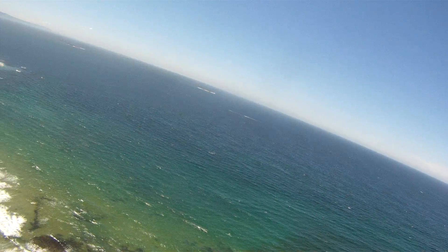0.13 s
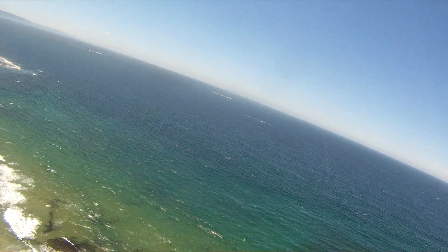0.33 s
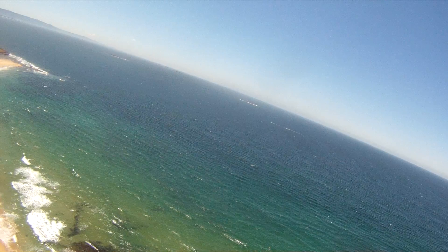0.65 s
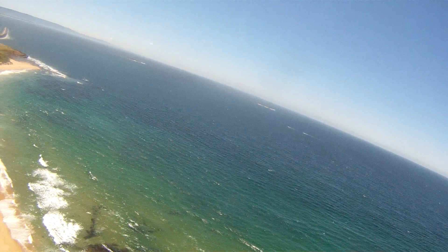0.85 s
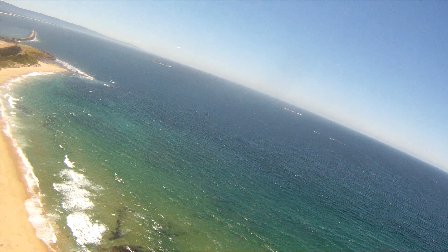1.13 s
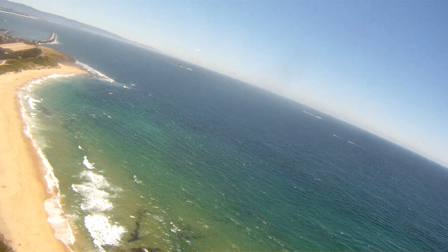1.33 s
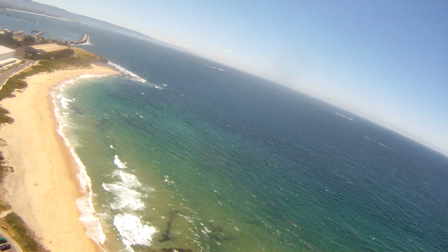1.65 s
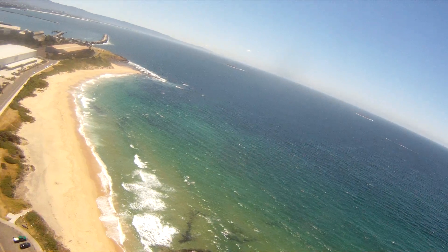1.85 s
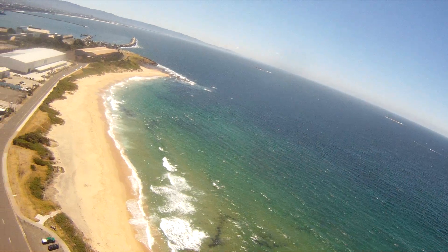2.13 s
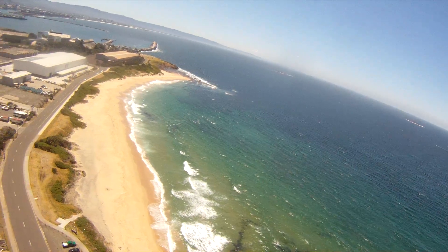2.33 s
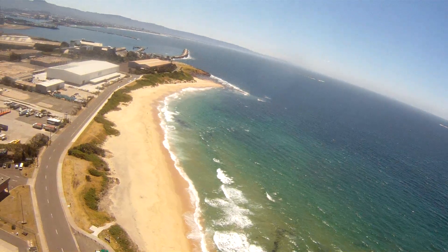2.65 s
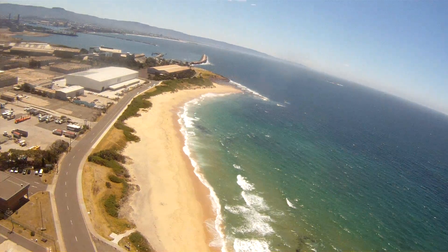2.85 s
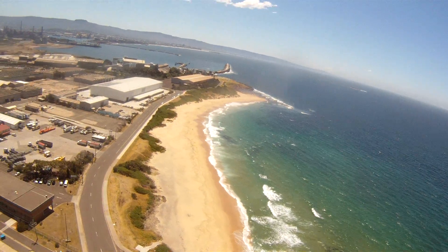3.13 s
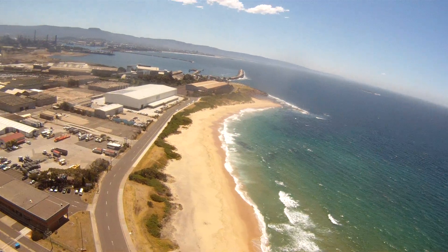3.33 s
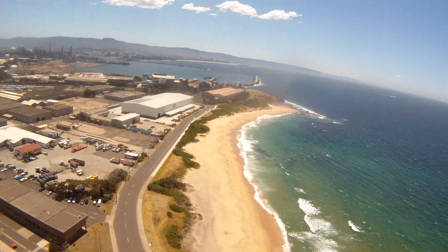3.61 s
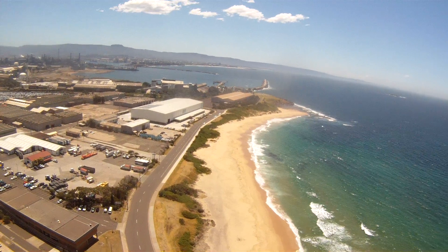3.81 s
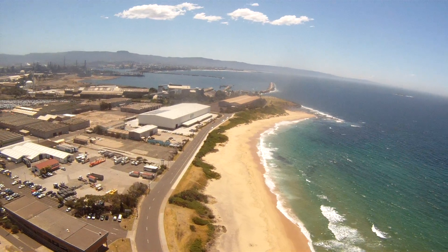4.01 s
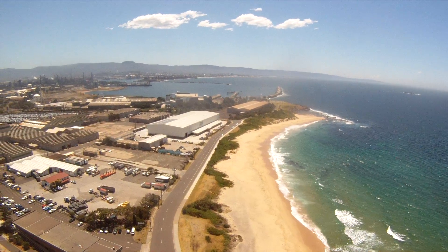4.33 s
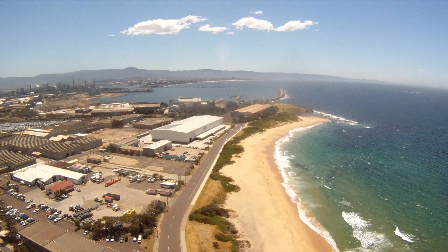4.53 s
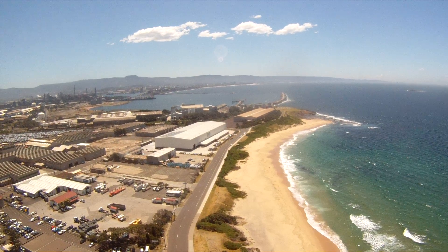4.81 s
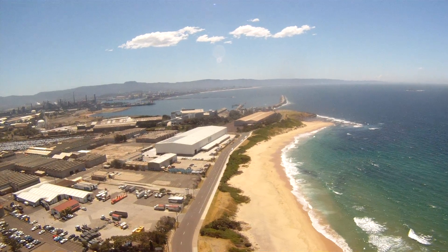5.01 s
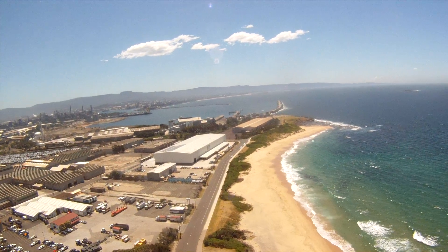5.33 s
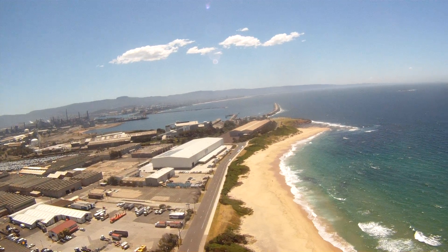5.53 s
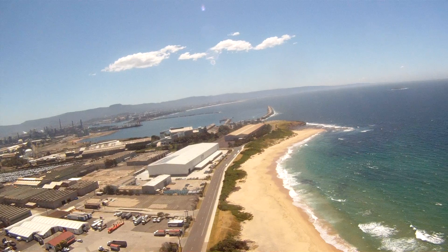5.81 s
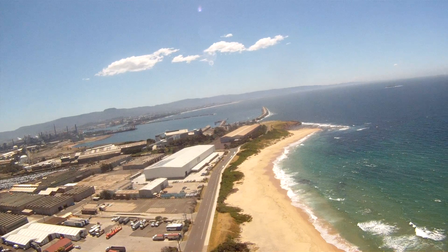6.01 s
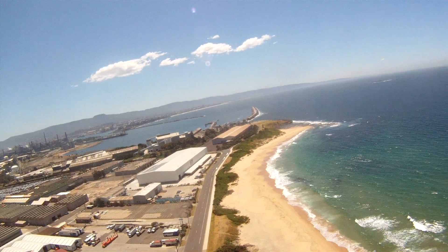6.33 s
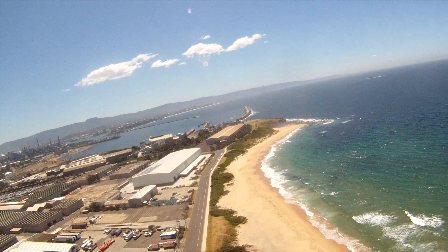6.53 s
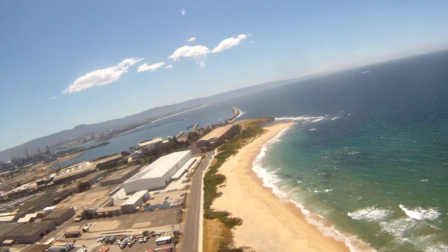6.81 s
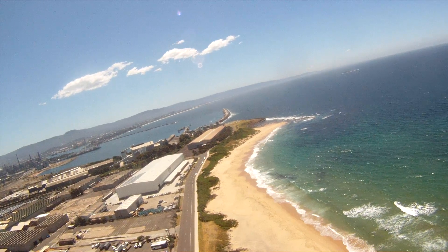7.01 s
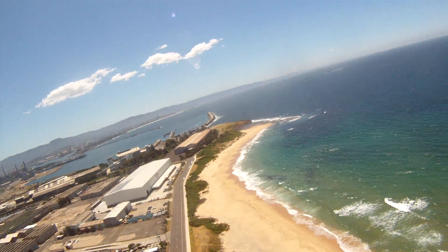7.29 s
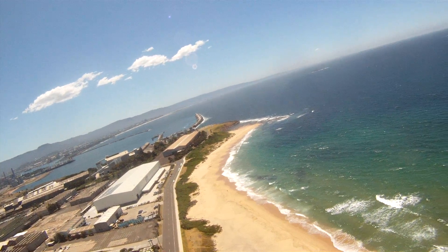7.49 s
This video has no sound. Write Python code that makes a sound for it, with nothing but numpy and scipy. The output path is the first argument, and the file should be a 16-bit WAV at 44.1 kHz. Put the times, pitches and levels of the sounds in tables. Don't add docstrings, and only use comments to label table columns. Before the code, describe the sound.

Wind presses on a camera microphone high in open air: deep uneven flutter, a hollow hum from the frame tube and a narrow nasal hiss. Early dull blows and air thumps give way to calmer flow with a thin steady whistle and a very faint lower drone. Loose fittings tick; taut wires snap with a short falling zip and low twang. Late on, a small hiss swell, more snaps and softer rumble.

```python
import sys
import numpy as np
from scipy import signal
from scipy.fft import rfft, irfft, next_fast_len
from scipy.io import wavfile
from scipy.ndimage import uniform_filter1d, map_coordinates

SR = 44100
rng = np.random.default_rng(int(sys.argv[2]) if len(sys.argv) > 2 else 0)


def invert_db(x):
    u = np.asarray(x, float) / 20
    return 10 ** u


def bounce(signal):
    frames = np.transpose(np.atleast_2d(signal))
    limited = np.clip(frames, -1, 1)
    pcm = np.round(limited * 32767).astype(np.int16)
    wavfile.write(sys.argv[1], SR, pcm)


N = 337806

# (time [s], strength [dB], lean to slow eddies [dB])
TURBULENCE = [(0, -29, 0.5), (.6, -33.5, 0), (1.05, -29, -0.5), (1.3, -28.5, 6), (1.55, -32.5, 2.5),
              (2.1, -31.5, 2), (2.6, -32, -2), (3.3, -30.5, -0.5), (4.0, -31, -2), (4.9, -32, -1),
              (5.5, -33.5, -2), (6.3, -35, 0), (6.9, -35.5, -3), (7.66, -37, 3.5)]


def unit(x):
    return x / np.sqrt(np.mean(x ** 2) + 1e-20)


def curves(rows):
    s, *cols = np.transpose(rows)
    return [np.interp(np.arange(N) / SR, s, c) for c in cols]


def wobble(knots_per_s):
    knots = rng.standard_normal(int(N * knots_per_s / SR) + 4)
    return map_coordinates(knots, [np.arange(N) * knots_per_s / SR])


def filtered(x, response):
    m = next_fast_len(len(x) + SR // 2)
    return irfft(rfft(x, m) * response(np.fft.rfftfreq(m, 1 / SR)), m)[:len(x)]


def modes(peaks):
    def response(f):
        return sum((-1) ** k * invert_db(db) * 1j * f * width / (hz * hz - f * f + 1j * f * width)
                   for k, (hz, width, db) in enumerate(peaks))
    return response


def jolted(response):
    return filtered(np.pad([1.], (0, SR // 2)), response)


def rush(peaks, steep, patchy_db=0):
    z = signal.stft(rng.standard_normal(N + 512), nperseg=512)[2]
    field = uniform_filter1d(rng.standard_normal(z.shape), size=6, axis=0)
    field = uniform_filter1d(field, size=10, axis=1)
    noise = signal.istft(z * invert_db(patchy_db * unit(field)), nperseg=512)[1][:N]
    return unit(filtered(noise, lambda f: np.abs(modes(peaks)(f)) ** steep))


def tone(rows, db, fade_s, edge_db, jitter_hz, flutter_db):
    hz, = curves(rows)
    t = np.arange(N) / SR
    inside_s = np.minimum(t - rows[0][0], rows[-1][0] - t)
    level_db = db + 3 + edge_db * np.clip(1 - inside_s / fade_s, 0, 1) + flutter_db * wobble(25)
    phase = 2 * np.pi * np.cumsum(hz + jitter_hz * wobble(60)) / SR
    return np.clip(inside_s / 0.026, 0, 1) * invert_db(level_db) * np.sin(phase)


def drone():
    # (time [s], pitch [Hz])
    pitch = [(2.2, 610), (3.3, 671), (5.1, 664), (5.8, 616), (6.6, 612)]
    return tone(pitch, db=-62.5, fade_s=0.88, edge_db=-4, jitter_hz=19.36, flutter_db=3)


def whistle():
    # (time [s], pitch [Hz])
    pitch = [(3.05, 2405), (3.36, 2448), (3.68, 2461), (3.8, 2478), (4.17, 2464), (4.3, 2485), (4.6, 2484),
             (4.9, 2454), (5.72, 2410)]
    return tone(pitch, db=-45.2, fade_s=.22, edge_db=-6, jitter_hz=3.7, flutter_db=1.5)


def seam():
    best_s, turn_s, loud_db, rest_db = 1.1, 1.45, -33.5, -50.5
    facing = np.exp(-((np.arange(N) / SR - best_s) / turn_s) ** 2)
    level_db = rest_db + (loud_db - rest_db) * facing + 0.4 * wobble(30)
    return invert_db(level_db) * rush([(2138, 160, 0)], steep=1.36)


def airflow():
    # (time [s], level [dB])
    flow = [(0.0, -32), (0.47, -32), (0.81, -33), (1.47, -34), (1.75, -32), (2.13, -33.5), (2.42, -31),
            (2.6, -35.5), (2.74, -39.5), (2.97, -37.5), (3.13, -40), (3.37, -40.5), (4.9, -42.5),
            (5.95, -40.5), (6.2, -37), (6.63, -35.5), (6.9, -37.5), (7.66, -38)]
    # (time [s], level [dB], half length [s])
    gusts = [(5.675, 7.5, 0.071)]
    # (time [s], level [dB], half length [s])
    shakes = [(.75, -4.5, 0.49), (2.0, 11, 0.13), (2.9, 3.5, 0.29), (6.1, 0, .1)]
    # (level [dB], growth with flow [dB/dB])
    hiss = [
        (-46, 0.78),
        (-38.5, 1.05),
        (-45.5, 1.06),
        (-55.5, 1.16),
    ]
    # (centre [Hz], width [Hz], level [dB])
    tube = [(162, 64, -9), (221.3, 24.6, 2), (243.2, 37.4, -3.5)]
    hum = [(389, 44, -0.5), (615, 44, -0.5), (855, 570, -6.5), (1540, 207, 1)]
    low = [(964, 55, -7), (1158, 102, 5.5), (1309, 125, 1)]
    mid = [(1700, 170, -1.5), (1969, 131, 1.5), (2151, 255, -2), (2532, 99, -2.5)]
    high = [(2738, 190, 1.83), (3083, 286, 1.86), (3302, 345, -0.89)]
    top = [(3757, 276, 3), (4615, 314, 2), (5590, 1200, -4)]
    full_flow_db = -38
    tube_db, tube_grows, hum_db, hum_grows = -47, 0.2, -50.5, 0.25

    t = np.arange(N) / SR
    gust_db = .4 * wobble(18) + 1.1 * wobble(45)
    swell_db = sum(db * np.exp(-((t - s) / half_s) ** 4) for s, db, half_s in gusts)
    rough_db = sum(db * np.exp(-((t - s) / half_s) ** 2) for s, db, half_s in shakes)
    strength_db = curves(TURBULENCE)[0]
    shaking_db = strength_db - strength_db.mean()
    drumming_db = 1.5 * wobble(8)
    tube_level_db = tube_db + tube_grows * shaking_db + rough_db + drumming_db
    hum_level_db = hum_db + hum_grows * shaking_db + 0.29 * rough_db + gust_db
    out = invert_db(tube_level_db) * rush(tube, steep=1.02)
    out += invert_db(hum_level_db) * rush(hum, steep=1.44, patchy_db=2.0)
    flow_db = curves(flow)[0] - full_flow_db
    for (db, grows), peaks in zip(hiss, (low, mid, high, top)):
        out += invert_db(db + grows * flow_db + gust_db + swell_db) * rush(peaks, steep=1.29, patchy_db=0.08)
    return out


def ring(s, db, partials, t60_s, crack):
    t = np.arange(SR // 20) / SR
    rattle = 1 + .35 * unit(uniform_filter1d(rng.standard_normal(len(t)), size=40))
    tones = sum(invert_db(level_db) * np.sin(2 * np.pi * hz * t) for hz, level_db in partials)
    wave = rattle * tones + crack * rng.standard_normal(len(t))
    rise = 1 - np.exp(-t / .0008)
    return np.pad(invert_db(db - 60 * t / t60_s) * rise * wave, (round(s * SR), N))[:N]


def fittings():
    # (time [s], level [dB], low partial [Hz], high partial [Hz])
    ticks = [(0.9434, -23, 2240, 3200), (1.4134, -18.5, 2190, 3180), (1.776, -22, 2200, 3330),
             (2.4584, -26, 1950, 3360), (2.924, -19.5, 2240, 3570), (3.025, -27, 2120, 3230),
             (3.0744, -26, 2000, 3350), (4.3269, -19, 2374, 3520), (5.6783, -26, 1720, 3380),
             (5.874, -18, 1790, 3200), (6.2493, -23, 1700, 3600), (6.7531, -19, 1700, 3180)]
    # (time [s], level [dB], low partial [Hz], high partial [Hz])
    pricks = [(2.1214, -36, 3190, 4610), (2.6554, -37, 3140, 4540), (3.6252, -33.5, 3100, 4430),
              (3.8751, -29.5, 2980, 4730), (5.1183, -40, 3100, 5110), (5.384, -34.5, 3630, 4570),
              (6.2497, -29, 2900, 4840)]
    out = np.zeros(N)
    for s, db, low_hz, high_hz in ticks + pricks:
        partials = [(low_hz, 0), (low_hz * 1.18, -4), (high_hz, -9)]
        out += ring(s, db + 2.5, partials, t60_s=0.017, crack=0.032)
    return out


def knocks():
    # (time [s], level [dB], brightness [dB/octave])
    blows = [(0.16, -25, 4.5), (1.236, -47, 0), (1.311, -27.5, -3.5), (1.393, -24, 0), (1.51, -20.5, 3),
             (1.583, -24, 1), (1.712, -20.5, 3), (1.766, -19, 0), (1.95, -29.5, 5), (3.686, -40, 8),
             (4.328, -23, 0), (6.752, -21.5, 1.5)]
    # (centre [Hz], width [Hz], level [dB])
    knocked = [(100, 20, 3), (235.5, 19, 7), (395.5, 22.3, -0.5), (646, 49, -13), (970, 57, -15.5),
               (1186, 45, -8.5), (1850, 400, -20)]
    out = np.zeros(N)
    for s, db, tilt_db in blows:
        case = [(hz, width, level_db + tilt_db * np.log2(hz / 400) + rng.normal(0, 1))
                for hz, width, level_db in knocked]
        out[round(s * SR):][:SR // 2 + 1] += invert_db(db + 38) * jolted(modes(case))
    return out


def scrape(decay_s):
    t = np.arange(SR // 50) / SR
    rasp = np.exp(-t / decay_s) * rng.standard_normal(len(t))
    return rasp / np.linalg.norm(rasp)


def wire(events, bracket, snap, travel_s, skirt_db, knock_db):
    # (centre [Hz], width [Hz])
    drummed = (230, 47)

    def travel(f):
        return np.exp(-2j * np.pi * travel_s * 2200 * np.arctan(f / 2200))

    def swept(f):
        return (modes(bracket)(f) ** 2 + 0.28 * modes([(1250, 1700, 0)])(f) ** 3) * travel(f)

    def knocked(f):
        return modes(bracket[1:2])(f) ** 2 + 0.57 * modes(bracket[:1])(f) ** 2

    def tube(f):
        body = modes([(*drummed, 0)])(f) ** 3
        skirt = invert_db(skirt_db) * modes([(250, 210, 0)])(f) ** 3 * travel(f) ** 0.18
        return body + skirt + modes([(385, 60, -11)])(f) ** 2 + modes([(153, 40, -8)])(f) ** 2

    out = np.zeros(N)
    sweep, knock = jolted(swept), jolted(knocked)
    for s, wire_hz, tick_db, sweep_db, ring_db in events:
        def trips(f):
            return 1 / (1 - 0.8 / (1 + (f / 430) ** 4) * np.exp(-2j * np.pi * f / wire_hz))

        hum = jolted(lambda f: tube(f) * travel(f) ** 1.14 * trips(f))
        rasped = signal.fftconvolve(sweep, scrape(decay_s=.004))[:len(hum)]
        ragged = .6 * sweep + .7 * rasped
        twang = invert_db(sweep_db + 16) * ragged + invert_db(knock_db + 23.0) * knock + invert_db(ring_db + 27.5) * hum
        out[round(s * SR):][:len(hum)] += twang
        out += ring(s, tick_db - 2.5, snap, t60_s=0.013, crack=0.13)
    return out


def wires():
    # (time [s], wire [Hz], tick [dB], sweep [dB], ring [dB])
    plucks = [(4.470, 21.94, -20, 3.8, 7.7), (6.204, 21.37, -18.5, 1.8, 7.1)]
    # (time [s], wire [Hz], tick [dB], sweep [dB], ring [dB])
    twangs = [(2.797, 22.27, -48, -1.5, -6.5), (3.037, 22.48, -21, 0.5, -2.5),
              (3.957, 22.65, -28, 2.5, -0.5), (5.497, 22.38, -13, 3, -2), (6.647, 22.13, -11, 1, -2)]
    # (centre [Hz], width [Hz], level [dB])
    brackets = [
        [(665, 100, -6), (958, 70, -3), (1230, 150, 2), (1720, 160, -4.5), (2000, 140, -4)],
        [(724, 47, -1), (1316, 103, -2.5), (1560, 79, -2.5), (2120, 180, -4)],
    ]
    # (pitch [Hz], level [dB])
    snaps = [
        [(2550, 4), (3200, 9), (3600, -8), (5200, -6.5)],
        [(1950, -4), (2800, -2), (4650, -14), (5200, -14.5)],
    ]
    stiff = wire(plucks, brackets[0], snaps[0], travel_s=.021, skirt_db=-30, knock_db=2.1)
    loose = wire(twangs, brackets[1], snaps[1], travel_s=.018, skirt_db=-9, knock_db=-6.5)
    return stiff + loose


def evened(x):
    return unit(x / np.abs(signal.hilbert(x, next_fast_len(N))[:N]) ** 0.25)


def buffet():
    # (time [s], slow [dB], fast [dB])
    eddies = [(.43, 5, 7), (.87, 7.5, -4), (1.2, -2, -8), (1.71, 1, 5), (1.9, 10, 8), (2.03, -2, 5),
              (2.33, -3, 2.5), (2.45, -1, 6.5), (2.86, 0, -3), (2.98, -3, -14), (3.11, 5, -1), (3.77, 3, 4),
              (4.14, -2, 2.5), (4.2, 3, -14), (5.06, 2, -3), (5.7, -1, -2), (6.02, -11, 8), (6.19, 4, -14),
              (6.25, -9, 8), (6.47, 7, -10), (6.66, 0, 3), (7.38, 4, 3), (7.6, 6, -13)]
    # (time [s], pitch [Hz])
    eddy_size = [(0, 70.6), (1.2, 72), (1.6, 76), (2.5, 84.2), (4.2, 89), (5, 76.9), (6.8, 79.5),
                 (7.66, 76)]
    # (time [s], level [dB], pitch [Hz], half length [s])
    thumps = [(1.80, -30, 225, .025), (1.845, -31, 150, .02), (1.875, -32, 250, .02),
              (1.902, -20, 70, .015), (1.962, -29, 240, .015), (2.025, -16, 95, .013),
              (2.03, -30, 230, .02), (2.165, -25, 80, .02), (3.155, -29, 225, .03)]
    # (centre [Hz], width [Hz], level [dB])
    slow_peaks = [(25.8, 18.4, -4.5), (40.2, 10, 5)]
    # (centre [Hz], width [Hz], level [dB])
    fast_peaks = [
        [(72, 6.8, 9), (92.6, 11.4, -23)],
        [(83.7, 31, 6), (101, 31, -5.5)],
    ]
    slow_offset_db, fast_offset_db, wander_db, wander_per_s = -3, -4, 1.5, 9
    eddy_s = 0.025

    t = np.arange(N) / SR
    passing_db = sum(np.outer(db, np.exp(-((t - s) / eddy_s) ** 2)) for s, *db in eddies)
    strength_db, lean_db = curves(TURBULENCE)
    swing_db = wander_db * np.array([wobble(wander_per_s), wobble(wander_per_s)])
    slow_db, fast_db = strength_db + np.array([lean_db, -lean_db]) + passing_db + swing_db
    small = np.clip((curves(eddy_size)[0] - 72) / 14, 0, 1)
    fast = np.sqrt(1 - small) * rush(fast_peaks[0], steep=1.104)
    fast += np.sqrt(small) * rush(fast_peaks[1], steep=1.58)
    out = invert_db(slow_db + slow_offset_db) * evened(rush(slow_peaks, steep=1.29))
    out += invert_db(fast_db + fast_offset_db) * evened(fast)
    for s, db, hz, half_s in thumps:
        out += invert_db(db) * np.exp(-((t - s) / half_s) ** 2) * np.cos(2 * np.pi * hz * (t - s))
    return out


def scene():
    air = drone() + whistle() + seam() + airflow()
    frame = fittings() + knocks() + wires()
    return (air + frame + buffet())[None]


def top_cut(x):
    return signal.sosfilt(signal.butter(12, 16190, fs=SR, output="sos"), x)


def record(dry):
    smooth = filtered(dry[0], lambda f: 1 / (1 + (f / 5650) ** 24))
    coarse = signal.resample(np.pad(smooth, (0, 8 * SR - N)), 8 * 12000)
    held = signal.resample(np.repeat(coarse, 4), 8 * SR)[:N]
    mix = filtered(held, lambda f: invert_db(np.interp(f, [15280, 15400, 15900], [0, -42, -55])))
    return top_cut(mix[None])


dry = scene()
out = record(dry)
bounce(out)
```